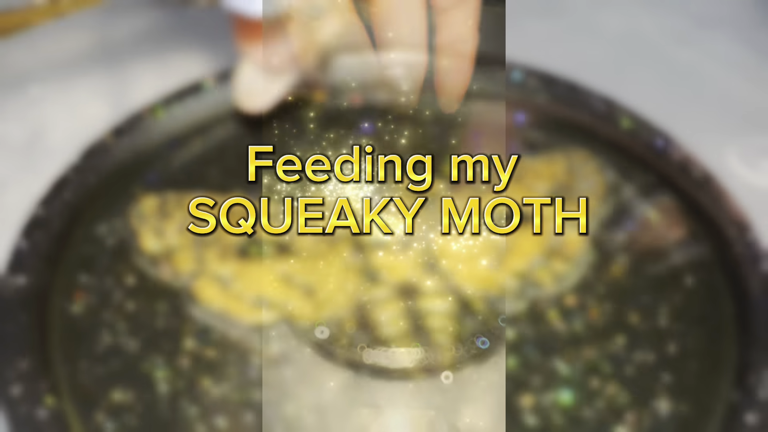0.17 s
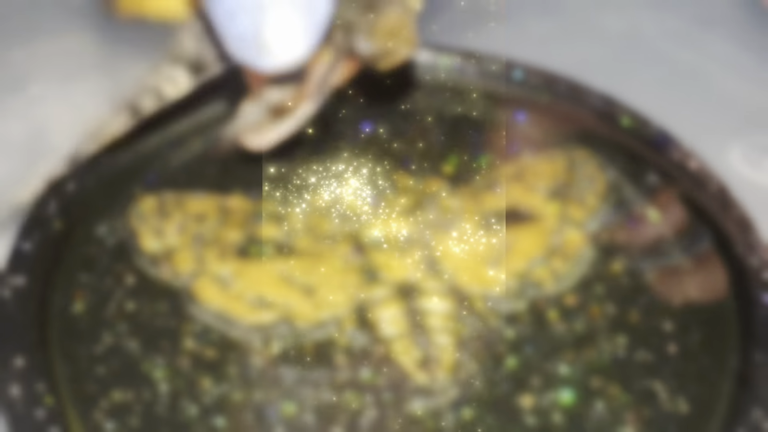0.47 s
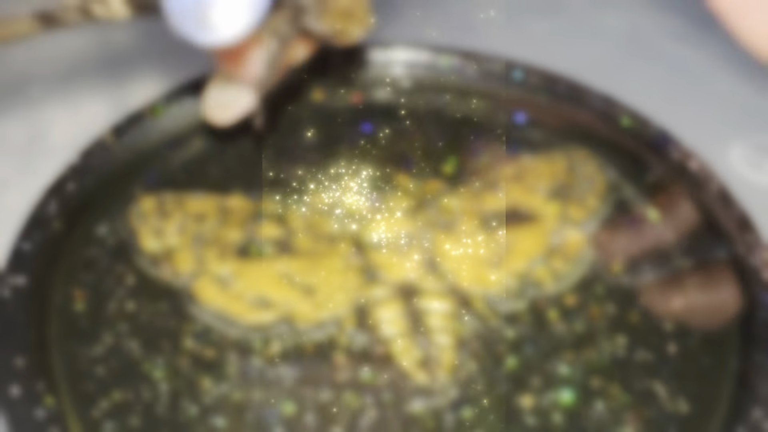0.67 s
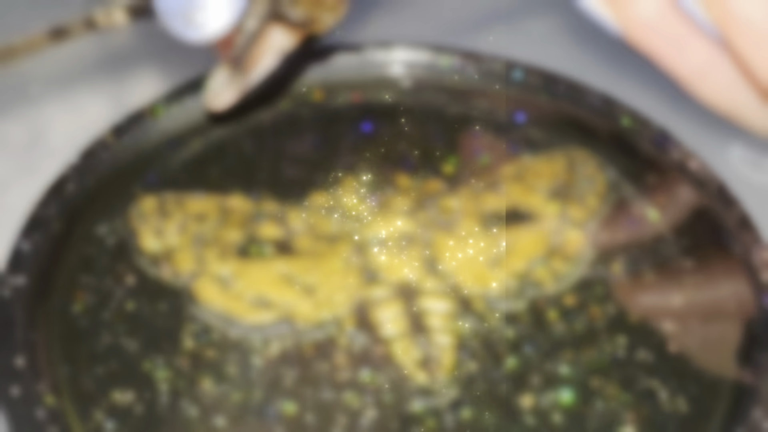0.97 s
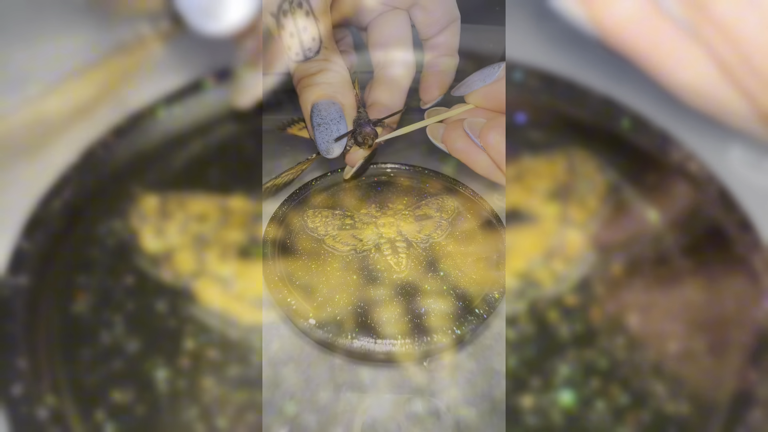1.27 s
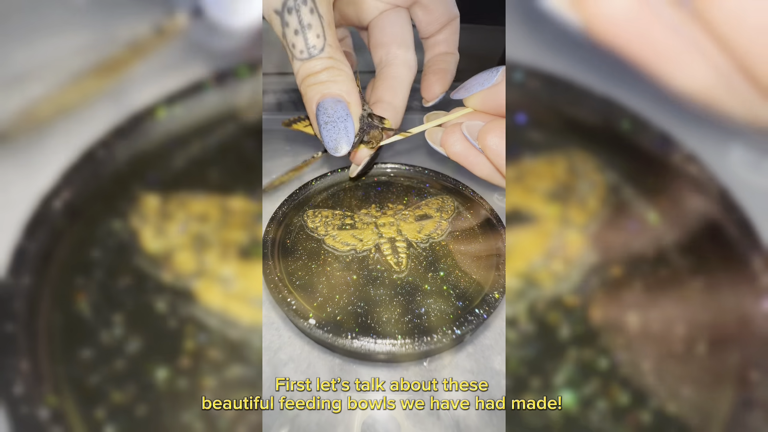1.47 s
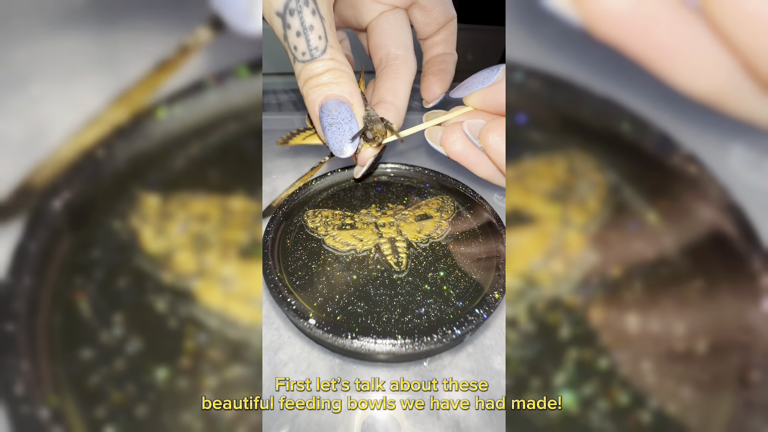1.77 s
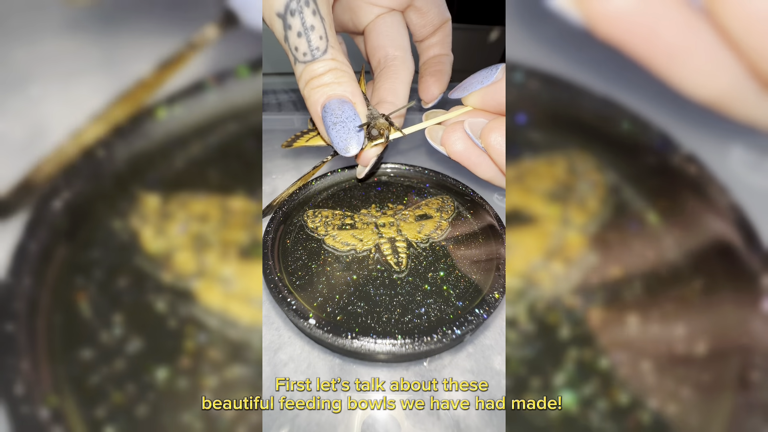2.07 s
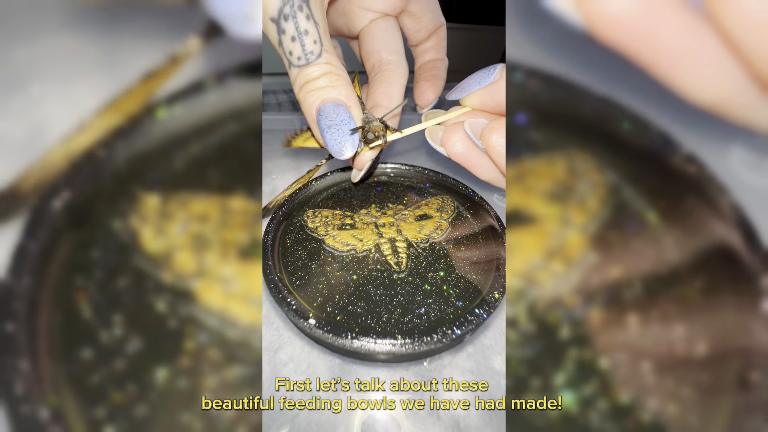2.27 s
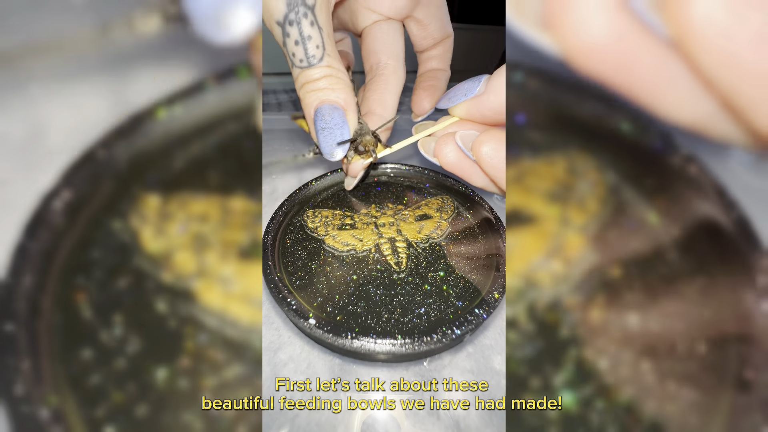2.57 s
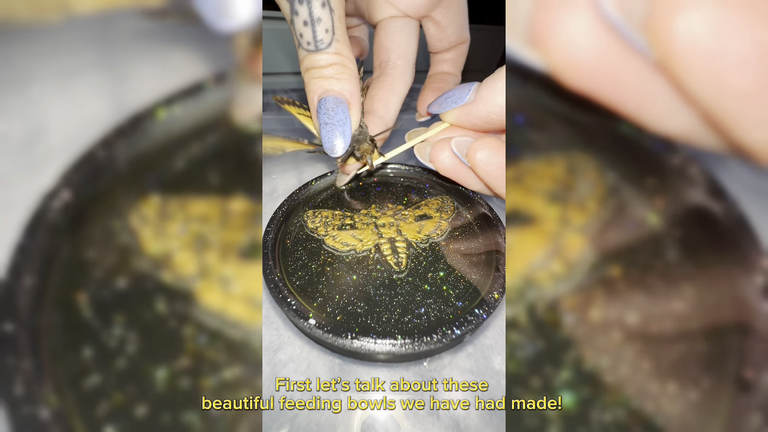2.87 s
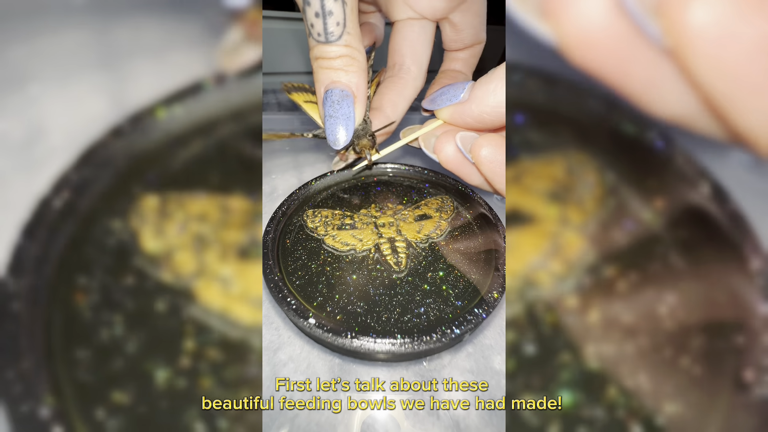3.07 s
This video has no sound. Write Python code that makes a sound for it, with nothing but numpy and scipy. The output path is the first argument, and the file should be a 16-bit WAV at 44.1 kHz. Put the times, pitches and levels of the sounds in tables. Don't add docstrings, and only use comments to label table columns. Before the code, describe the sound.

A hawkmoth squeaks in rapid, irregular bursts of high, raspy clicks while held over a bowl

```python
import sys
import numpy as np
from scipy import signal
from scipy.fft import rfft, irfft, next_fast_len
from scipy.io import wavfile
from scipy.ndimage import uniform_filter1d, map_coordinates

SR = 44100
rng = np.random.default_rng(int(sys.argv[2]) if len(sys.argv) > 2 else 0)


def gain_from_decibels(decibels):
    exponent = np.asarray(decibels, float) / 20
    return 10 ** exponent


def bounce(signal):
    frames = np.transpose(np.atleast_2d(signal))
    limited = np.clip(frames, -1, 1)
    pcm = np.round(limited * 32767).astype(np.int16)
    wavfile.write(sys.argv[1], SR, pcm)


N = 143325

# start_s, level_db
HANDLING_RUMBLE = [(0.0, -56.5), (.2, -57.5), (0.751, -63), (1.3, -57.5), (1.59, -53), (1.63, -62.5),
                   (1.999, -64), (2.55, -62), (3.1, -62), (3.25, -58)]
# frequency_hz, density_db
RUMBLE_SPECTRUM = [(14, -50), (30, -12), (50, 2), (102, 0.5), (125, -11), (166, -13), (400, -25.5),
                   (520, -61), (880, -120)]
# start_s, level_db
RUSTLE_LEVEL = [(0, -74), (.15, -85.5), (.3, -71.5), (.6, -72.5), (.85, -80), (1.08, -79), (1.3, -76),
                (1.55, -72), (1.66, -83.5), (1.97, -79.5), (2.4, -79.5), (2.65, -74.5), (3.05, -77.5),
                (3.25, -74)]
# frequency_hz, density_db
HISS_SPECTRUM = [(250, -10), (450, -15.5), (800, -19.5), (1300, -21), (2900, -16), (4500, -19.5),
                 (9000, -20.5), (11500, -29), (15500, -37.5)]
# start_s, tick_db, body_db, thud_db
FINGER_BUMPS = [(0.002, -47.5, -54, -49), (.016, -52.5, -54, -61), (0.087, -86, -64, -42),
                (.116, -86, -67, -51), (0.326, -48.5, -49.5, -51), (0.466, -48, -53.5, -59.5),
                (0.476, -45.5, -44.5, -50.5), (0.645, -46.5, -59.5, -52), (0.791, -63, -67.5, -60),
                (0.936, -52, -54.5, -57), (1.27, -59.5, -62, -63.5), (1.417, -40.5, -52, -66.5),
                (1.556, -55.5, -59, -61), (1.604, -62, -64.5, -69.5), (2.717, -49.5, -51.5, -50),
                (2.806, -48.5, -50.5, -55), (2.834, -77, -68, -51.5), (2.881, -42, -41.5, -43.5),
                (2.895, -85, -54, -45), (2.965, -69, -64, -51.5), (3.152, -59, -72, -59.5)]
# pitch_hz, level_db, decay_t60_s
BOWL_MODES = [(1030, 3.5, .014), (1420, 2, .012), (1760, -8.5, .01)]
# pitch_hz, level_db, decay_t60_s
BODY_MODES = [(183.7, -2, 0.019), (271, 3.5, .04), (416, -0.5, 0.058), (549, 7, 0.017)]
# start_s, length_s, level_db, first_gap_ms, last_gap_ms
SUDDEN_TRAINS = [(0.2232, 0.028, -20.5, 2, 3.67), (0.259, 0.014, -19.5, 3.9, 4.3),
                 (0.496, 0.015, -20, 2.2, 4.1), (0.552, 0.005, -18.5, 3.3, 3.5),
                 (0.575, 0.0066, -21, 4.8, 3.83), (0.602, 0.0067, -17.5, 2.9, 2.3),
                 (0.6464, 0.0592, -20.5, 2, 2.94), (1.1035, 0.028, -23, 1.76, 2.32),
                 (1.169, 0.052, -21, 1.7, 3), (1.276, 0.0031, -34.5, 4.2, 3.13),
                 (1.3517, 0.0076, -29, 2.1, 3.6), (1.4314, 0.0079, -26, 4, 2.9),
                 (1.711, 0.0153, -26.5, 1.57, 3.2), (1.734, 0.019, -22, 0.98, 4),
                 (1.788, 0.0195, -19.5, 1.8, 4), (1.834, 0.035, -20.5, 2.37, 3.07),
                 (2.0817, 0.0039, -35.5, 3.2, 3.1), (2.508, 0.008, -30.5, 2.76, 2.8),
                 (2.53, 0.044, -29, 2.8, 4.7), (2.927, 0.0765, -30.5, 2.13, 4.85),
                 (3.115, 0.0037, -48, 1.6, 3.3), (3.2285, 0.0189, -35, 3.87, 5.9)]
# start_s, length_s, level_db, first_gap_ms, last_gap_ms
SWELLING_TRAINS = [(0.372, 0.035, -21, 1.2, 1.9), (1.3334, 0.011, -30, 2.2, 2.7),
                   (1.4742, 0.016, -19.5, 1.3, 3.1), (2.002, 0.0077, -34, 1.6, 2.1),
                   (2.031, 0.0084, -29.5, 1.3, 1.4), (2.129, 0.0176, -26.5, 1.2, 2.3),
                   (2.1883, 0.017, -24, 1.2, 2.7), (2.244, 0.0456, -26.5, 1.1, 2.86),
                   (2.425, 0.053, -31.5, 2, 2.5), (2.6819, 0.094, -30.5, 1.63, 4.3),
                   (2.895, 0.024, -30, 1.3, 3.13), (3.208, 0.014, -41, 2.8, 3.92)]
# start_s, level_db
LONE_SNAPS = [(0.0164, -30), (0.476, -40), (0.5642, -24.5), (1.141, -52.5), (1.4983, -50.5), (1.882, -23.5),
              (2.0575, -36.5), (2.3171, -35.5), (2.3275, -39), (2.4949, -36), (2.584, -32), (2.7897, -30.5),
              (2.811, -37), (3.0121, -35), (3.0279, -40.5), (3.1321, -48.5)]
# start_s, level_db
MORE_SNAPS = [(.003, -30), (0.279, -39.5), (.2805, -38), (0.3252, -28), (.7655, -57.5), (0.961, -58),
              (1.227, -43), (1.2655, -40.5), (1.2676, -41), (1.289, -45), (1.5605, -44.5), (1.8969, -40)]
# centre_hz, width_hz, level_db
THROAT_RESONANCES = [(1157, 1600, -29.5), (3180, 940, -29.5), (4500, 2110, -10), (8000, 2010, 2.5),
                     (12300, 1000, -10), (13800, 1500, -8)]
HEAD_TURN_CHANGE = [7, 8, 2.5, -2, 6, 8.3]
# time_s, top_resonance_db
MOUTH_FACING = [(0.251, -4), (0.392, 5.5), (0.499, -1.5), (0.581, 7.5), (0.679, -5.5), (1.2, -2.5),
                (1.452, -3), (1.8, 3), (1.858, 9.5), (2.03, 0), (2.139, 2.5), (2.272, -5.5), (2.501, 2),
                (2.72, 5), (2.92, -3.5), (3.22, 4.5)]
# start_s, length_s, level_db, first_pitch_hz, last_pitch_hz, glide_ms, half_pitch_db
AIR_WHISTLES = [(0.2866, 0.012, -37, 3975, 4450, 9, -7), (0.726, 0.0098, -40, 3990, 4780, 7.3, -2),
                (0.752, 0.011, -37.5, 4580, 3226, 30, -21.5), (1.2268, .027, -37.5, 2955, 4674, 4, -21),
                (1.244, 0.014, -38.5, 3750, 3460, 5.5, -25), (1.882, 0.015, -43.5, 2617, 2960, 3.7, -12),
                (1.895, 0.042, -63, 6100, 6050, 2.2, -33), (2.321, 0.024, -44, 6900, 6660, 4.8, -19),
                (2.345, 0.006, -48.5, 4980, 2810, 4.3, -16), (2.599, 0.013, -45.5, 6880, 6940, 1.4, -16),
                (2.622, 0.0097, -47, 6910, 6710, 2.4, -31), (3.182, 0.019, -66.5, 7100, 7440, 3.3, -22)]
# frequency_hz, level_db
PIPE_COLOUR = [(2000, -32), (3000, -22), (4500, -1), (6500, -4.5), (9000, 5), (10500, -16), (15000, -18.5)]
# level_db, decay_t60_s
ECHO_TAILS = [(-5.5, 0.015), (-25.5, .16)]
# frequency_hz, left_lead_rad
PORT_LEAD = [(180, 0.2), (280, 2.5), (750, 2.3), (1100, 0.2), (5500, .15), (7500, -1.5), (9300, -1.7),
             (10300, -3), (13600, -3.2), (14600, -4.1)]
# frequency_hz, likeness_0_to_1
DIRECT_LIKENESS = [(300, .87), (1200, .92), (2500, .97), (5500, .98), (7000, .86), (9300, .86),
                   (10300, .92), (13600, .92), (14600, .82)]
# frequency_hz, likeness_0_to_1
DIFFUSE_LIKENESS = [(60, 0.49), (150, 0.25), (1000, 0.5), (2500, 0.94), (5800, 0.89), (7000, 0.28),
                    (9300, 1), (10300, 0.68), (15000, 1)]

TOP_HZ = 16900


def unit(x):
    return x / np.sqrt(np.mean(x ** 2) + 1e-30)


def along(points, hz):
    f, v = np.transpose(points)
    return np.interp(np.log(hz + 1), np.log(f + 1), v)


def over_time(points):
    return np.interp(np.arange(N) / SR, *np.transpose(points))


def wobble(rate, n=N):
    return map_coordinates(rng.standard_normal(n // 16), [np.arange(n) * rate / SR])


def filtered(x, response):
    m = next_fast_len(N + SR // 2)
    return irfft(rfft(x, m) * response(np.fft.rfftfreq(m, 1 / SR)), m)[..., :N]


def shaped_noise(spectrum, shape):
    return unit(filtered(rng.standard_normal(shape), lambda hz: gain_from_decibels(along(spectrum, hz))))


def ports(pair, likeness):
    def mixing(hz):
        u = np.arccos(np.clip(along(likeness, hz), 0, 1)) / 2
        lead = np.exp(0.5j * along(PORT_LEAD, hz))
        left = [np.cos(u) * lead, np.sin(u) * lead]
        right = [np.cos(u) / lead, -np.sin(u) / lead]
        return np.array([left, right])
    return filtered(pair[None], mixing).sum(axis=1)


def add(track, s, x):
    k = max(round(s * SR), 0)
    track[k:k + len(x)] += x[:len(track) - k]


def room_tone():
    t = np.arange(N) / SR
    left_only = [[1], [0]]
    table_turns = 78.6 * np.cumsum(1 + 0.0594 * wobble(6)) / SR
    table_tone = gain_from_decibels(-2.5 + 0.93 * wobble(22)) * np.sin(2 * np.pi * table_turns)
    handling = gain_from_decibels(over_time(HANDLING_RUMBLE) - 1.0 + 2.9 * wobble(18))
    rumble = handling * (shaped_noise(RUMBLE_SPECTRUM, (2, N)) + table_tone * left_only)
    hum = gain_from_decibels(-65.5) * np.sin(2 * np.pi * 100.6 * t) * left_only
    rustle_db = over_time(RUSTLE_LEVEL) + 3.5 + 1.5 * wobble(9.1) + 2 * wobble(46)
    rustle = gain_from_decibels(rustle_db) * shaped_noise(HISS_SPECTRUM, (2, N))
    return ports(rumble + hum + rustle, DIFFUSE_LIKENESS)


def ringing(modes, t):
    out = np.zeros(len(t))
    for hz, level_db, t60 in modes:
        decay = gain_from_decibels(level_db + rng.normal(0, 2.3) - 60 * t / t60)
        out += decay * np.sin(2 * np.pi * hz * rng.normal(1, 0.14) * t)
    return out


def bumps():
    out = np.zeros(N)
    t = np.arange(SR // 8) / SR
    thud_hz, thud_start_hz, sag_s, rise_s = 72.7, 224.7, 0.01185, 0.0087
    turns = thud_hz * t + (thud_start_hz - thud_hz) * sag_s * (1 - np.exp(-t / sag_s))
    contact = 1 - np.exp(-t / 0.00056)
    for s, tick_db, body_db, thud_db in FINGER_BUMPS:
        scratch = gain_from_decibels(-4.5 - 60 * t / 0.023) * rng.standard_normal(len(t))
        tick = gain_from_decibels(tick_db - 2.5) * (ringing(BOWL_MODES, t) + scratch)
        body = gain_from_decibels(body_db) * ringing(BODY_MODES, t)
        thud = gain_from_decibels(thud_db + 3 - 60 * t / 0.16) * np.sin(2 * np.pi * turns * rng.normal(1, 0.08))
        add(out, s, (tick + body) * contact + thud * (1 - np.exp(-t / rise_s)))
    return out


def train(s, length, db, first, last, swell_db):
    n = max(round(3000 * length / (2 * first + last)), 1)
    luck = rng.standard_normal((60, 42))
    gaps = first + (last - first) * np.linspace(0, 1, n) ** 2
    gaps = gaps * (1 + 0.04 * luck[:n, -1])
    t = np.append(0, np.cumsum(gaps)) * length / gaps.sum()
    swell_ms = 6.6
    return [(s + u, db - swell_db * np.exp(-1000 * u / swell_ms), row) for u, row in zip(t, luck)]


def throat(hz, part):
    response = np.zeros((3, 2, len(hz)), complex)
    for (centre, width, db), change_db in list(zip(THROAT_RESONANCES, HEAD_TURN_CHANGE))[part]:
        for k in range(3):
            c = centre * (1 + 0.039 * (k - 1))
            band = (1j * hz * width / (c * c - hz * hz + 1j * hz * width)) ** 2
            for turned in range(2):
                response[k, turned] += gain_from_decibels(db + turned * change_db) * band
    return response


def clicks():
    rows = []
    for call in SUDDEN_TRAINS:
        rows += train(*call, 0.29)
    for call in SWELLING_TRAINS:
        rows += train(*call, 11)
    rows += [(s, db, rng.standard_normal(42)) for s, db in LONE_SNAPS + MORE_SNAPS]
    blows = np.zeros((3, 2, N))
    t = np.arange(40) / SR
    head_turns_s, puff_ms = 1.95, 0.51
    for s, db, luck in rows:
        stretch = np.digitize(luck[40], [-0.43, 0.43])
        puff = 0.15 * luck[1:41] * np.exp(-1000 * t / puff_ms)
        blow = gain_from_decibels(db + 0.1 * luck[0]) * ((t == 0) + puff)
        add(blows[stretch, int(s > head_turns_s)], s, blow)
    low = filtered(blows, lambda hz: throat(hz, slice(0, -1))).sum(axis=(0, 1))
    top = filtered(blows, lambda hz: throat(hz, slice(-1, None))).sum(axis=(0, 1))
    return gain_from_decibels(18.5) * (low + gain_from_decibels(over_time(MOUTH_FACING)) * top)


def whistles():
    out = np.zeros(N)
    n = 3000
    t = np.arange(n) / SR
    for s, length, db, first_hz, last_hz, glide_ms, half_db in AIR_WHISTLES:
        glide = (1 - np.exp(-1000 * t / glide_ms)) / (1 - np.exp(-1000 * length / glide_ms))
        hz = first_hz + (last_hz - first_hz) * np.minimum(glide, 1)
        hz = hz * (1 + 0.0062 * wobble(700, n))
        turns = np.cumsum(hz) / SR
        tone = np.zeros(n)
        for k in np.arange(1, 7) / 2:
            level_db = along(PIPE_COLOUR, k * hz) + half_db * 2 * (k % 1) + 6.5 * wobble(760, n)
            tone += gain_from_decibels(level_db) * np.sin(2 * np.pi * k * turns) * (k * hz < TOP_HZ)
        fade = np.clip(np.minimum(t / 0.0015, (length - t) / 0.00087), 0, 1)
        add(out, s, gain_from_decibels(db) * tone * fade)
    size = np.sqrt(np.abs(uniform_filter1d(out ** 2, size=45)))
    return out + gain_from_decibels(-7.5) * size * shaped_noise(PIPE_COLOUR, N)


def echoes(x):
    t = np.arange(SR // 5) / SR
    decay = sum(gain_from_decibels(db) * unit(gain_from_decibels(-60 * t / t60)) for db, t60 in ECHO_TAILS)
    tail = decay * rng.standard_normal((2, len(t))) / np.sqrt(len(t))
    late = np.pad(x, (14, 0))
    return signal.fftconvolve(late[None], tail, axes=1)[:, :N]


def scene():
    near = bumps() + clicks() + whistles()
    direct = ports(np.array([near, near * wobble(900)]), DIRECT_LIKENESS)
    return room_tone() + direct + ports(echoes(near), DIFFUSE_LIKENESS)


def band_limit(x):
    return signal.sosfilt(signal.butter(12, 17030, fs=SR, output="sos"), x)


def record(dry):
    roll_hz = 16100
    mix = filtered(dry, lambda hz: (hz < TOP_HZ) / np.sqrt(1 + (hz / roll_hz) ** 40))
    return band_limit(mix)


dry = scene()
out = record(dry)
bounce(out)
```